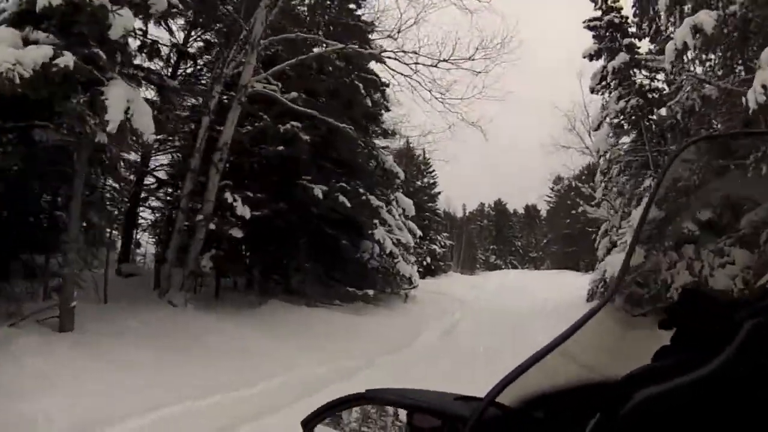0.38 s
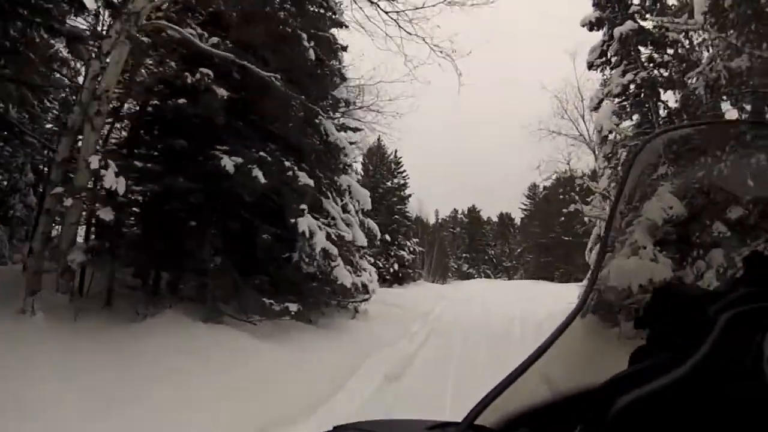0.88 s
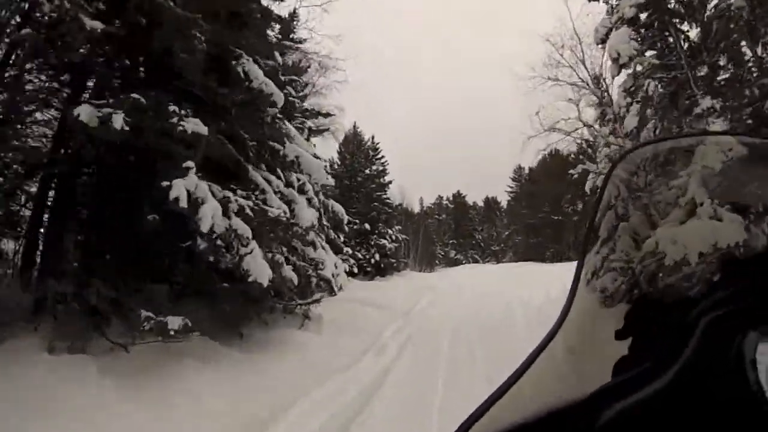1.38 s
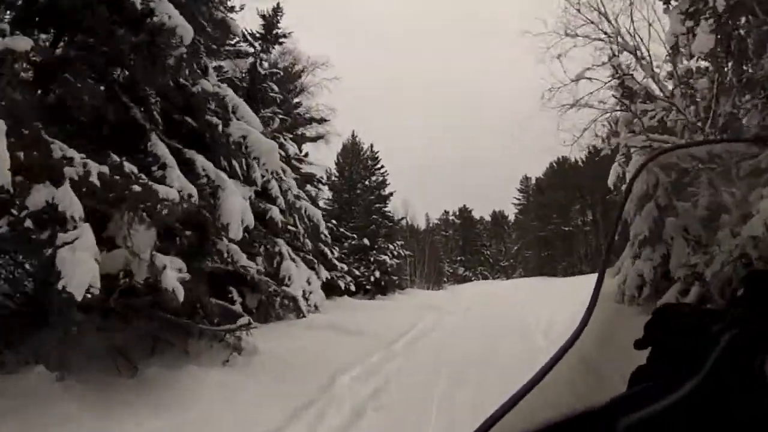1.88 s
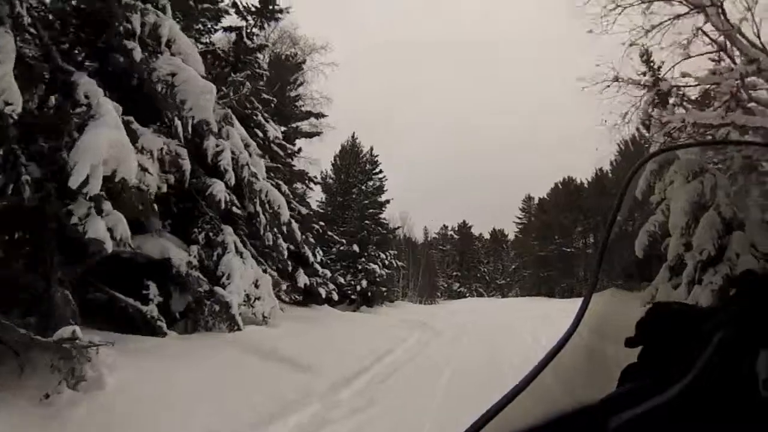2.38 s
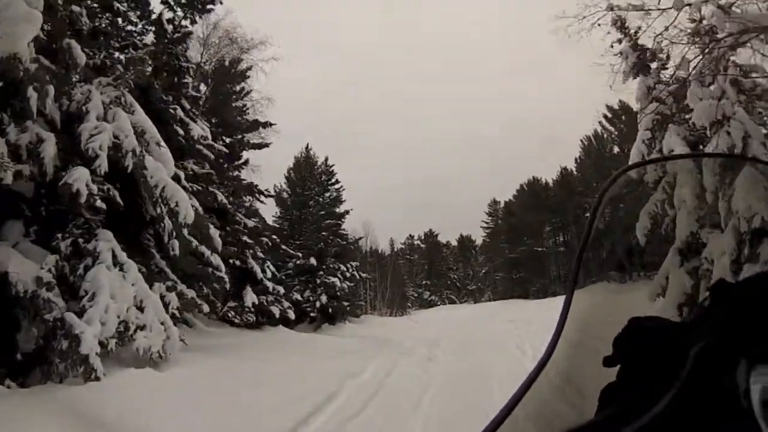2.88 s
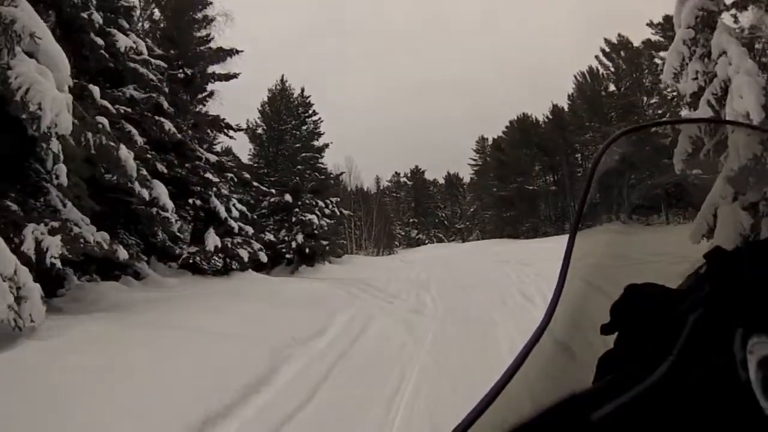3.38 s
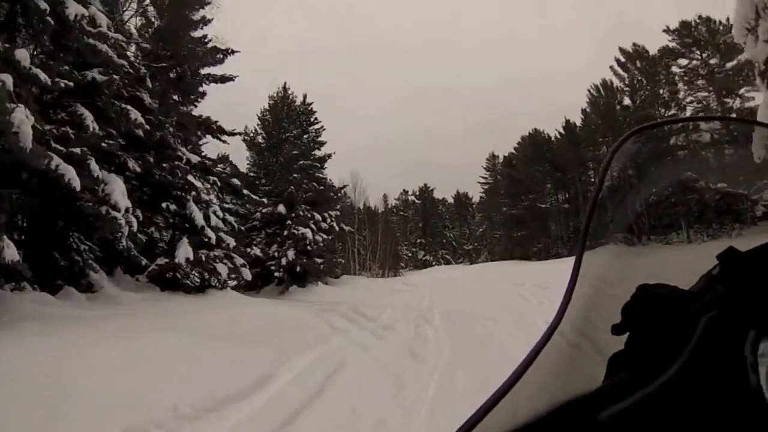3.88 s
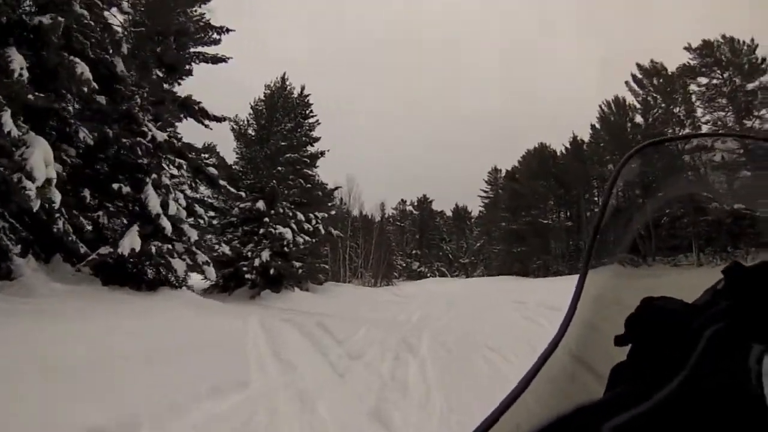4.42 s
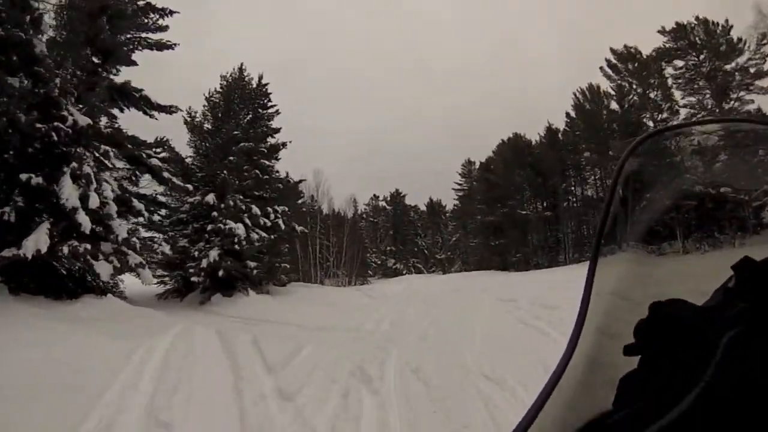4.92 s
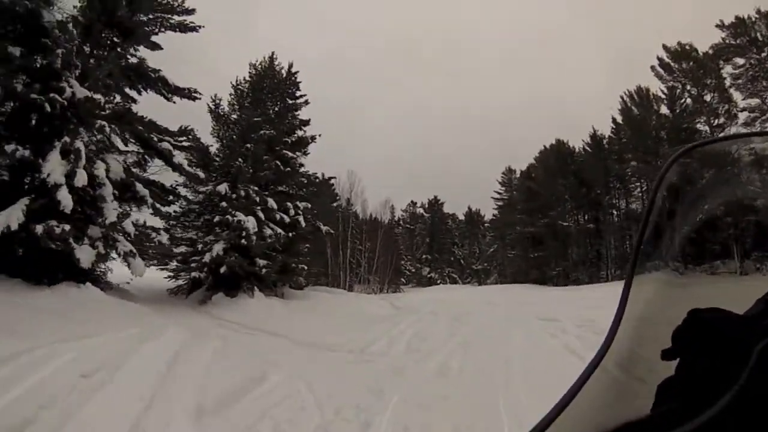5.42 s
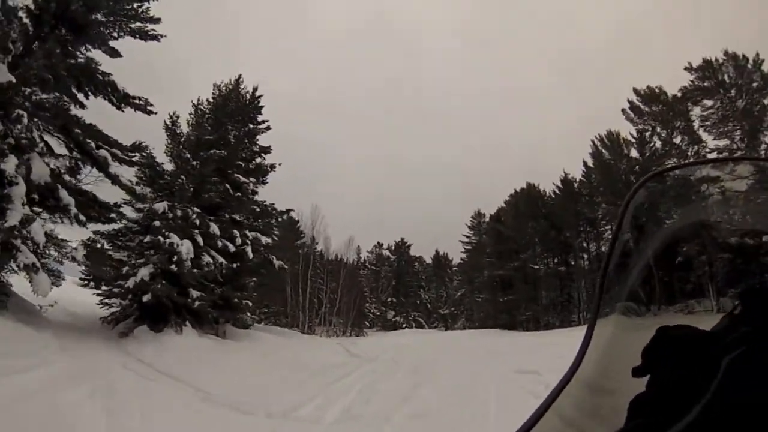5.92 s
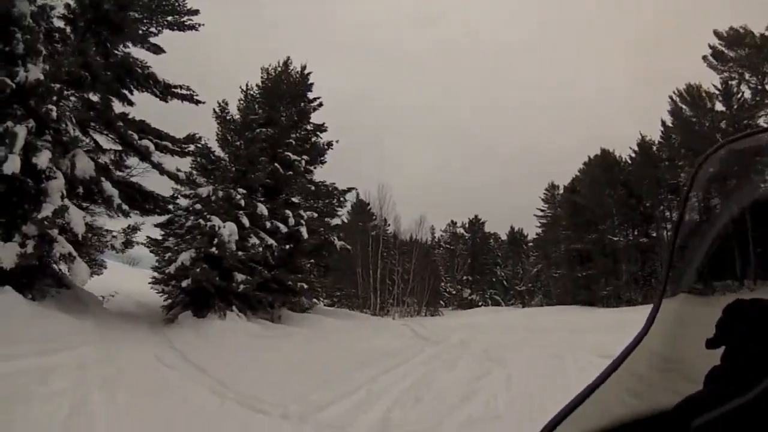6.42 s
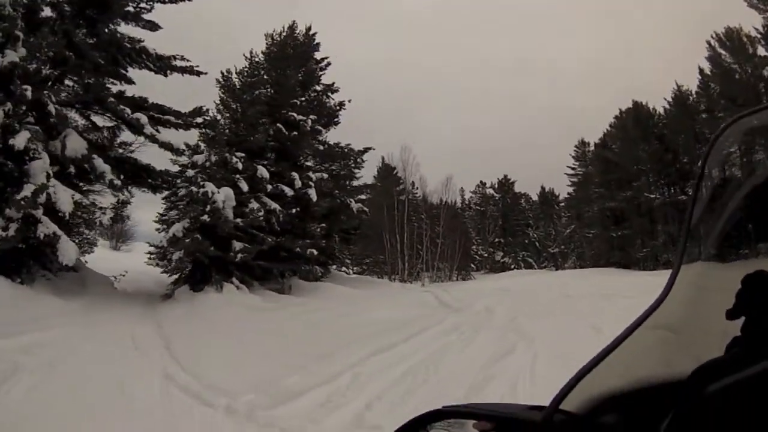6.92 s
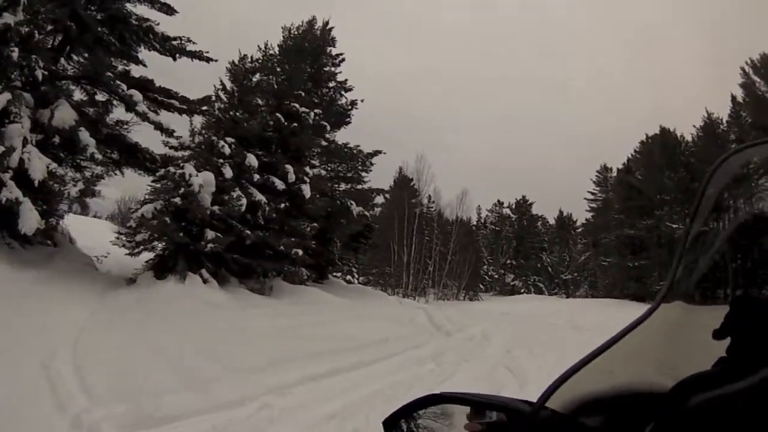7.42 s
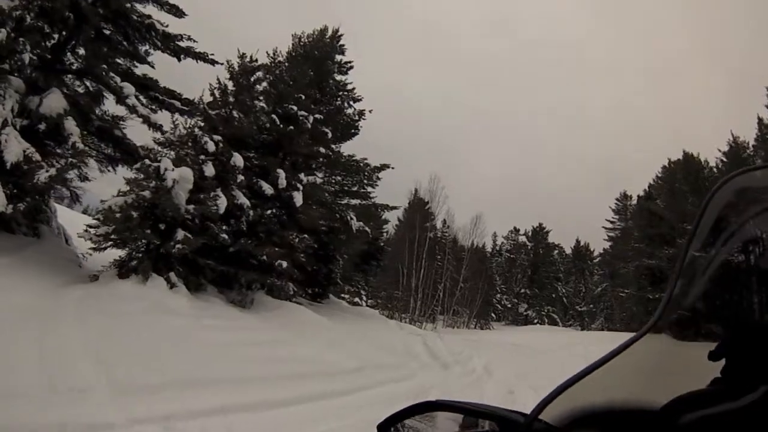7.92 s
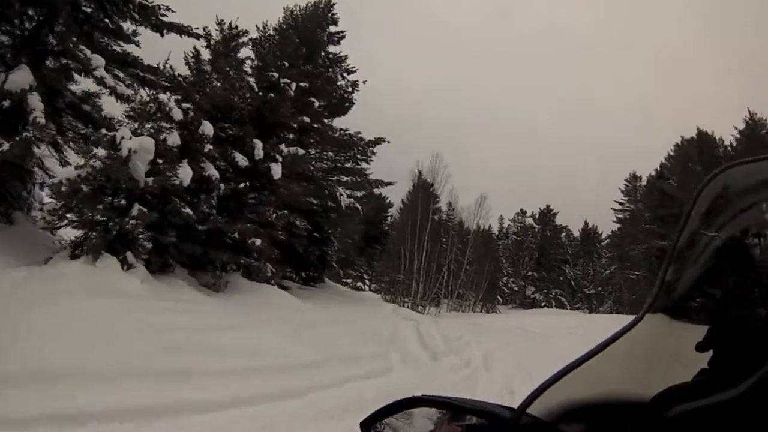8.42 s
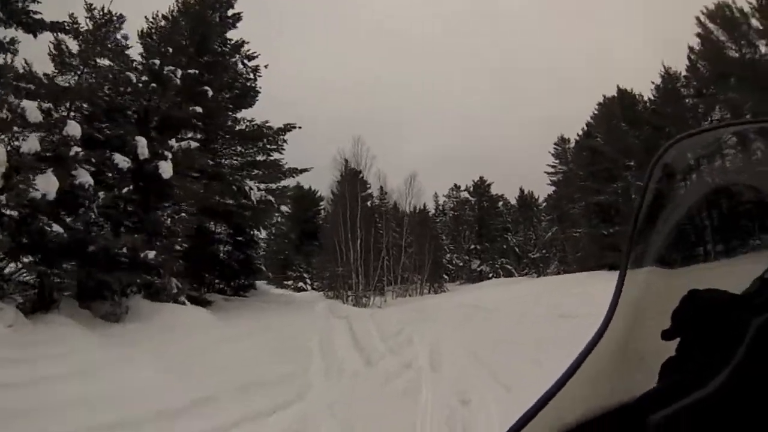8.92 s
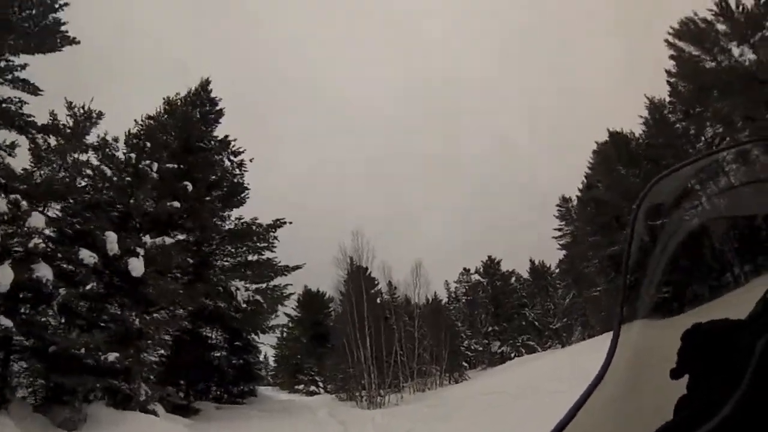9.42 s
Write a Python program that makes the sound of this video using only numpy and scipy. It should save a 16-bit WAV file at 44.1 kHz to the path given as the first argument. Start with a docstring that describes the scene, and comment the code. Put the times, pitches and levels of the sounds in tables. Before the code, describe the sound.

A snowmobile engine drones with a deep, boxy boom and muffled hiss while bumps shudder low and plastic ticks and knocks rattle close by.

```python
"""A three-cylinder snowmobile cruises on a snowy trail, heard by a camera shut in a plastic case on the rider.
From the start the engine booms as tones locked to its firings, and noise rings in the case; ticks come at once.
Bumps shudder the mount near 35 Hz throughout; a flurry of ticks comes near 3 s and more from 5.7 s.
From 6.2 s knocks of a loose part grow frequent, and between 7.5 and 9.2 s the ticks crowd together.
At 9.22 s the throttle closes: upper engine tones swell briefly, then the hiss and rumble ease."""
import sys
import numpy as np
from scipy import signal
from scipy.fft import rfft, irfft, next_fast_len
from scipy.io import wavfile
from scipy.ndimage import uniform_filter1d, map_coordinates

SR = 44100
rng = np.random.default_rng(int(sys.argv[2]) if len(sys.argv) > 2 else 0)


def voltage_ratio(decibels):
    """Convert decibels (scalar or array-like) to amplitude ratios, 20 dB per decade."""
    exponent = np.asarray(decibels, float) / 20
    return 10 ** exponent


def put_to_file(sound):
    """Save the sound as 16-bit audio at rate SR, in the file named by the first command-line argument."""
    columns = np.atleast_2d(sound).T  # one column per channel
    safe = np.clip(columns, -1, 1)
    whole_steps = np.round(safe * 32767)
    wavfile.write(sys.argv[1], SR, whole_steps.astype(np.int16))


N = 421596
TIME = np.arange(N) / SR  # seconds

# engine speed as its firing rate [time_s, firing_hz]
FIRING_RATE = [(0.0, 55.6), (0.25, 58.4), (0.5, 59.05), (0.95, 58.2), (1.3, 56.1), (1.48, 56.2),
               (1.7, 57.35), (2.3, 58.05), (3.1, 58.3), (3.3, 58.65), (3.95, 58.15), (4.3, 56.7),
               (4.7, 57.4), (4.9, 58.4), (5.4, 58.0), (6.35, 58.0), (6.75, 58.4), (7.1, 58.4), (7.35, 58.2),
               (7.95, 58.25), (8.3, 57.95), (8.5, 58.6), (8.95, 56.8), (9.09, 54.2), (9.22, 52.3),
               (9.56, 52.8)]
# boom at the firing rate [time_s, level_db]
BOOM_LEVEL = [(0.0, -32), (0.05, -16.5), (0.21, -20), (0.45, -14.5), (0.74, -23.5), (0.8, -25), (0.85, -15),
              (1.25, -14.5), (1.3, -22), (1.36, -16), (5.43, -15.5), (6.02, -17.5), (6.42, -15.5),
              (6.58, -20), (6.65, -15), (7.45, -17.5), (7.59, -22), (7.93, -16), (8.44, -21), (8.57, -15),
              (8.73, -15.5), (8.86, -22.5), (9.08, -15.5), (9.21, -24.5), (9.25, -17), (9.28, -15),
              (9.38, -14.5), (9.51, -16.5), (9.56, -21)]
# tone at twice the firing rate [time_s, level_db]
SECOND_LEVEL = [(0.0, -42), (0.05, -22.5), (0.85, -35.5), (0.88, -27), (1.2, -36), (1.73, -42),
                (1.81, -26.5), (3.01, -41), (3.11, -24), (3.43, -31.5), (4.07, -28.5), (4.82, -39),
                (4.9, -28.5), (8.04, -41.5), (8.07, -29.5), (8.95, -46), (9.18, -37), (9.23, -25),
                (9.28, -35), (9.38, -30), (9.44, -36), (9.52, -28), (9.56, -37)]
# whine at six times the firing rate [time_s, level_db]
WHINE_LEVEL = [(0, -50), (0.6, -48), (1.4, -46.5), (2.5, -48.5), (3.2, -50.5), (3.9, -50), (4.4, -47),
               (4.95, -54), (5.5, -48.5), (6.0, -51.5), (7.0, -49), (7.7, -50.5), (8.4, -47.5), (8.95, -47),
               (9.2, -51), (9.56, -59)]
# faint upper engine tones [multiple of the firing rate, cruise_db, gain_as_throttle_closes_db]
FAINT_TONES = [(3, -48, 12.5), (4, -52.5, 17), (5, -74, -5), (7, -63, -4), (8, -66.5, 13), (10, -64.5, 3),
               (12, -67, -7)]
# engine and track clatter in the case; the drone and hiss follow it [time_s, clatter_db]
CLATTER_LEVEL = [(0.0, -34.5), (0.4, -35), (0.77, -34.5), (1.14, -37), (2.29, -36.5), (2.9, -39.5),
                 (3.19, -36), (3.62, -38), (4.15, -35), (4.5, -39.5), (5.01, -39.5), (5.67, -36),
                 (6.23, -40.5), (6.58, -34.5), (7.22, -39), (7.72, -38), (7.91, -34.5), (9.1, -35),
                 (9.265, -33), (9.285, -42), (9.56, -41)]
# lower resonances of the case [pitch_hz, width_hz, level_db]
CASE_LOW = [(1142, 102, -6), (1390, 82, -3.5), (1477, 53, 0.5), (1595, 81, 1.5), (1967, 92, -7.5),
            (2176, 60, -8), (2430, 177, -12.5), (2800, 310, -20.5)]
# upper resonances of the case, for the hiss [pitch_hz, width_hz, level_db]
CASE_HIGH = [(3380, 600, -6), (4060, 310, -0.5), (4890, 280, 1), (5580, 545, -5.5), (6370, 600, -6),
             (9540, 960, -20), (10760, 610, -20), (13500, 2000, -39)]

# ringing modes that every blow sets off, before each kind of blow alters them [pitch_hz, t60_s]
RING_MODES = [(500, 0.014), (670, 0.034), (1200, 0.015), (1450, 0.014), (2010, 0.0088), (2260, 0.0096),
              (2600, 0.0089), (3200, 0.016), (3960, 0.019), (4930, 0.0075), (5500, 0.0037), (6500, 0.0072),
              (7800, 0.011), (9550, 0.0037), (11300, 0.0088), (13000, 0.0034)]
# family of each mode: 0 panel, 1 knock, 2 tick, 3 clink, 4 snap, 5 chime, 6 hum of the panel [family]
MODE_FAMILY = [0, 6, 1, 1, 2, 2, 2, 3, 3, 5, 5, 4, 4, 4, 4, 4]
# how strongly a tick drives each mode [level_db]
TICK_MODES = [-8, -4, -8.5, -2, -2.5, -9, -15.5, -5.5, -6.5, -8, -9, -2.5, -6.5, -8.5, -6, -10]
# how strongly a knock drives each mode [level_db]
KNOCK_MODES = [-14, -19, -3, -10, -34, -12, -13, -19, -14, -7.5, -17.5, -18, -12, -14, -14, -24]
# how strongly a thunk drives each mode [level_db]
THUNK_MODES = [-5, -5, -11, -20, -24, -4, -9, -12, -28, -24, -23, -22, -29, -32, -28, -34]
# sharp ticks on the case, last three against the tick [start_s, tick_db, knock_db, clink_db, snap_db]
TICKS = [(0.025, -28, 2, -18, -28), (0.165, -23, 1, -18, -28), (0.199, -26.5, 8, -20, -30),
         (0.0767, -19.5, -7, -18, -22), (0.131, -20.5, -13, -18, -20), (0.54, -19.5, -6, -18, -24),
         (0.6284, -22.5, -17, -2, -8), (0.6552, -18, -15, -9, -8.5), (3.0718, -24, -18, -14, -34),
         (3.0877, -24, -16, -20, -32), (3.1032, -23, -18, -22, -34), (3.1368, -21, -10, -24, -34),
         (3.1551, -20, -15, -21, -34), (3.1716, -23, -18, -20, -34), (3.1865, -24, -16, -18, -34),
         (3.2065, -31, 2, -18, -34), (3.7673, -20.5, -9, -25, -30), (5.7046, -30, -14, 6, -10),
         (5.7133, -18, -14, -4, -12), (5.7216, -17, -2, -1, -4.5), (5.7605, -26, 0, -16, -30),
         (5.813, -21, 1, -10, -32), (5.867, -24, 2, -10, -27), (5.9189, -21.5, -19, -11, -27),
         (6.0202, -22, -21, -21, -23), (6.0513, -23, -17, -23, -34), (6.4357, -18.5, -2, -13, -37),
         (6.4691, -27, -19, -21, -39), (7.5328, -19, -2, -14, -25), (7.5629, -15, -17, -14, -25),
         (7.622, -23, -10, -20, -32), (7.6526, -18, -9, -20, -25), (7.706, -24, -2, -12, -32),
         (7.7394, -31, 0, -20, -32), (7.805, -25, 5, -20, -34), (7.824, -25.5, 5, -18, -34),
         (7.9419, -25, 3, -18, -34), (8.0118, -24, 4, -20, -34), (8.514, -32, -8, -6, -30),
         (8.576, -25, 3, -20, -34), (7.6854, -17, -22, -15, -25), (7.7717, -23, -3, -14, -18),
         (7.8917, -20, 0, -9, -39), (7.9782, -15, -2, -13, -28), (8.0294, -22.5, 5.5, -16, -31),
         (8.0656, -21, 0, -17, -35), (8.2021, -17.5, -15, -14, -21), (8.2362, -17, -7, -19, -26),
         (8.528, -12, -5, -11, -23), (8.5456, -14, -24, -23, -37), (8.8168, -23, -12, -9, -14),
         (8.8318, -21.5, -11, 0, -12), (9.1213, -20.5, 1, -3, -10), (9.1398, -10.5, -2, -7.5, -23),
         (9.2625, -32, 4, -18, -34), (9.3218, -29, 5, -20, -30), (9.3412, -30, 9, -22, -26),
         (9.381, -26, 6.5, -25, -38), (9.3985, -29.5, 9, -18, -31), (9.436, -31, 6, -6, -36)]
# a loose part knocking in step with the engine's cycle, last three against the blow
# [start_s, level_db, knock_db, clink_db, chime_db]
KNOCKS = [(4.088, -29.5, 4, 4, -14), (6.2672, -28.5, 0.5, -5, -1), (6.9884, -24.5, -6, -4, -7),
          (7.037, -23.5, -7, -1, 2.5), (7.195, -30.5, 2, 0, -10), (7.242, -30, 1, 0, 1.5),
          (7.4005, -28.5, 2, -1, -6), (7.4482, -26, 1.5, -3, -1), (7.5, -33, 3, 4, -12),
          (7.5525, -27.5, 1.5, -5, -28), (7.8635, -28.5, 1, 2, -8), (7.9113, -23.5, 2, -3, -9),
          (7.967, -34, 1, -19, -19), (8.1718, -27, 4, -1, -3), (8.221, -27.5, 1, -26, -26),
          (8.3801, -31, 2, -2, -4), (8.431, -21, -4, -3, -4), (8.584, -26.5, 2, -6, -6),
          (8.633, -24, 1, -1, 2.5), (8.684, -21, -6.5, -1, -3), (8.7923, -25, 0, -6, -7),
          (8.846, -29, 2.5, 2, -10), (9.173, -29, -2, 0, -3), (9.4768, -34, -1, 1, -14)]
# dull thunks on a panel of the case, hum against the thunk [start_s, level_db, hum_db]
THUNKS = [(0.625, -17.5, 2.5), (0.6552, -20, 1.5), (5.7046, -30, 0), (5.7133, -35, -2), (9.2617, -23, -11)]
# spells of loose parts chattering [start_s, length_s, middle_level_db, share of the firings that tick]
CHATTER_SPELLS = [(5.741, 0.2, -29.5, 0.38), (6.444, 0.22, -27.5, 0.76), (7.604, .7, -29.5, .4),
                  (8.5, 0.46, -30, .4)]
# low thumps through the mount, moved to the nearest boom trough [near_s, peak_db, pitch_hz]
THUMPS = [(0.046, -22, 120), (0.117, -21, 125), (0.134, -24, 130), (5.427, -17, 115), (5.549, -22, 105),
          (9.234, -21, 115), (9.27, -20, 125)]

# mount shudder on bumps [time_s, level_db]
SHUDDER_LEVEL = [(0.0, -20), (0.1, -36), (0.88, -31), (0.93, -43), (1.17, -27), (1.51, -22.5), (1.59, -31),
                 (2.39, -26), (2.88, -35), (2.93, -25.5), (3.27, -35), (3.35, -25), (3.49, -39),
                 (3.89, -30), (3.99, -33), (4.42, -28), (5.43, -33), (6.12, -19), (6.26, -33), (6.55, -34),
                 (7.69, -17), (8.02, -31), (8.28, -24), (8.33, -29), (8.79, -34), (8.94, -45), (9.24, -32),
                 (9.56, -39)]
# middle pitch of the shudder [time_s, pitch_hz]
SHUDDER_PITCH = [(0, 38.08), (5.7, 39.1), (6.2, 35.56), (6.9, 37.77), (7.3, 33.9), (8.1, 32.77),
                 (8.5, 35.9), (9.56, 33.5)]
# tone colour of the rumble through the sled [pitch_hz, level_db]
RUMBLE_COLOUR = [(12, -120), (20, -17), (40, -0.5), (80, -3.5), (105, -2.5), (150, -11.5), (220, -23),
                 (320, -35.5), (600, -120)]
# jolts that swell the rumble [centre_s, gain_db]
JOLTS = [(0.08, 5.5), (0.61, 9), (3.83, 8), (4.9, 3), (5.43, 5), (9.24, 5)]
# tone colour of the track drone [pitch_hz, level_db]
DRONE_COLOUR = [(100, -120), (200, -0.5), (300, 0.5), (420, -1), (520, -7), (680, -4), (850, -6.5),
                (1100, -9.5), (2000, -120)]

START_TURN = 0.4  # share of a firing already past at the start
COAST_S, COAST_FADE_S = 9.22, 0.34  # throttle closes (s); time scale of the upper tones sinking back (s)
CRUISE_DB, HISS_DB = -37, -46.5  # clatter at cruise, and the hiss that goes with it
HISS_GROWS = 0.86  # dB of hiss per dB of clatter
HISS_COAST_DB, HISS_LAG_S = -2.5, 0.054  # the hiss drops soon after the throttle closes
RUMBLE_DB, RUMBLE_COAST_DB, RUMBLE_LAG_S = -28.5, -1, 0.074  # the rumble eases later still
JOLT_S = 0.041  # from a jolt's centre to where its dB gain is down to 37 percent
TICK_PANEL_DB, MIDDLING_DB = -10.5, -24  # panel against a tick of middling level; that level
PANEL_LOSS = 0.56  # dB the panel falls behind for each dB a tick exceeds the middling one
KNOCK_PANEL_DB, KNOCK_SNAP_DB = -27, -29  # against the knock
SAGS_BELOW_HZ = 3000  # only modes below this bend in pitch
STRAY_SHARE, STRAY_DB = 0.08, -30.5  # ticks outside the spells: share of the firings, middle level
CHATTER_LEAD = 0.25  # share of a firing ahead of the boom's crest


def firings():
    """Counts the firings so far by adding up the firing rate, a little uneven from stroke to stroke."""
    return np.cumsum(curves(FIRING_RATE)[0]) / SR + START_TURN + 0.013 * wobble(25)


def boom(turns):
    """Nearly pure tones at multiples of the firing rate; the upper ones sharpen the boom's troughs."""
    angle = 2 * np.pi * turns
    first_db = curves(BOOM_LEVEL)[0] + 0.43 * wobble(22) + 0.53 * wobble(9)
    second_db = curves(SECOND_LEVEL)[0] + 1.6 * wobble(13)
    whine_db = curves(WHINE_LEVEL)[0] + 1.2 * wobble(8)
    tones = voltage_ratio(first_db) * np.cos(angle + 0.29 * wobble(4))
    tones += voltage_ratio(second_db) * np.cos(2 * angle - 2.1)
    tones += voltage_ratio(whine_db) * np.cos(6 * angle + 0.2 * wobble(8))
    # the closing throttle changes the upper tones for a moment
    since_coast = np.maximum(TIME - COAST_S, 0)
    freed = coast(0) * np.exp(-(since_coast / COAST_FADE_S) ** 2)
    for multiple, cruise_db, coast_db in FAINT_TONES:
        level_db = cruise_db + coast_db * freed + 0.76 * wobble(13) + 2.4 * wobble(4)
        # counting the angle from the trough makes all of these dip together there
        tones -= voltage_ratio(level_db) * np.cos(multiple * (angle + np.pi) + 0.25 * wobble(8))
    return np.sqrt(2) * tones  # so that the levels are rms


def clatter(turns):
    """Engine and track noise pass through the resonances of the case: low clatter and high hiss."""
    clatter_db, = curves(CLATTER_LEVEL)
    hiss_db = HISS_DB + HISS_GROWS * (clatter_db - CRUISE_DB) + HISS_COAST_DB * coast(HISS_LAG_S)
    shared = wobble(9)  # both rise and fall together
    low = filtered(puffs(turns, depth_db=-0.5, scatter_db=1.58, lead=0.71), resonances(CASE_LOW))
    low = filtered(low, high_pass(hz=1020))
    high = filtered(puffs(turns, depth_db=0.6, scatter_db=1.36, lead=0.51), resonances(CASE_HIGH))
    high = filtered(high, high_pass(hz=2880))
    return voltage_ratio(clatter_db + 0.56 * shared) * unit(low) + voltage_ratio(hiss_db + 0.71 * shared) * unit(high)


def puffs(turns, depth_db, scatter_db, lead):
    """Noise that swells and sinks once a firing, each stroke at its own chance strength."""
    shifted = turns + lead  # lead is a share of a firing
    stroke = np.floor(shifted).astype(int) + 2
    size_db = scatter_db * rng.standard_normal(N // 400)[stroke]
    size_db = uniform_filter1d(size_db, size=150)  # no sudden steps between strokes
    swell_db = depth_db * np.cos(2 * np.pi * (shifted - 0.5))
    return unit(voltage_ratio(size_db + swell_db) * rng.standard_normal(N))


def rattle(turns):
    """Blows on the case: sharp ticks, softer knocks that scrape and sag in pitch, and dull thunks."""
    # each row: start, level, then panel, knock, clink, snap, chime and hum against the level
    ticks = []
    for s, db, knock, clink, snap in [*TICKS, *chatter(turns)]:
        panel = TICK_PANEL_DB - PANEL_LOSS * (db - MIDDLING_DB)
        ticks.append((s, db, panel, knock, clink, snap, clink, 0))
    knocks = [(s, db, KNOCK_PANEL_DB, knock, clink, KNOCK_SNAP_DB, chime, 0)
              for s, db, knock, clink, chime in KNOCKS]
    thunks = [(s, db, 0, 0, 0, 0, 0, hum) for s, db, hum in THUNKS]
    sound = blows(knocks, np.array(KNOCK_MODES), contact=0.0004, hold=0.008, sustain=1.3,
                  detune=0.015, sag=0.067, scrape=1.1, blur=0.3)
    sound += blows(thunks, np.array(THUNK_MODES), contact=0.00055, hold=0.001, sustain=0.9,
                   detune=0.02, sag=-0.03, scrape=0.3, blur=0.08)
    sound += blows(ticks, np.array(TICK_MODES), contact=0.00017, hold=0.0008, sustain=0.9,
                   detune=0.03, sag=-0.03, scrape=0.5, blur=0.07)
    return sound


def chatter(turns):
    """Loose parts tick on firings picked by chance, densely in the spells; gives rows like TICKS."""
    steady_turns = np.maximum.accumulate(turns)  # never counts backwards
    s = np.flatnonzero(np.diff(np.floor(steady_turns + CHATTER_LEAD))) / SR
    share, db = np.full(len(s), STRAY_SHARE), np.full(len(s), float(STRAY_DB))
    for start, length, level, dense in CHATTER_SPELLS:
        inside = (s > start) & (s < start + length)
        share[inside], db[inside] = dense, level
    pick, loud, knock, clink, snap = rng.random((N // 600, 5))[:len(s)].T
    rows = np.column_stack([s, db + 5 * (loud - 0.5), -3 + 9 * knock, -17 + 8 * clink, -30 + 6 * snap])
    return rows[pick < share]


def blows(rows, share_db, contact, hold, sustain, detune, sag, scrape, blur):
    """Each blow makes the same modes ring: they rise, hold while driven, then die away exponentially.

    contact and hold are in s; sustain stretches the t60; detune is the chance spread of pitch, as a share.
    sag is the share by which low modes fall in pitch (negative: rise); blur spreads their starts (cycles).
    scrape roughens the tone: the phase strays at random by about half of it (radians) each millisecond.
    """
    out, t = np.zeros(N + SR), np.arange(SR // 20) / SR
    hz, t60 = np.transpose(RING_MODES)
    decay_db = -60 * np.maximum(t - hold, 0) / (sustain * t60[:, None])
    swell = (1 - np.exp(-t / contact)) ** 2 * voltage_ratio(decay_db)
    swell = swell / swell.max(axis=1, keepdims=True)
    sag = sag * (hz < SAGS_BELOW_HZ)
    bent = t + sag[:, None] * 0.011 * (1 - np.exp(-t / 0.0099))  # time runs fast, then settles
    luck = rng.standard_normal((len(rows), 3, len(hz)))
    for (s, db, panel, knock, clink, snap, chime, hum), (size, tune, phase) in zip(rows, luck):
        family_db = np.take([panel, knock, 0, clink, snap, chime, panel + hum], MODE_FAMILY)
        level_db = db + share_db + family_db + 1.74 * size
        # a random walk in steps of 44 samples, smoothed
        drift = np.cumsum(rng.standard_normal((len(hz), 52)), axis=1)
        drift = np.repeat(drift, 44, axis=1)
        drift = uniform_filter1d(drift - drift[:, :1], size=44)[:, :len(t)]
        pitch = hz * (1 - sag / 2 + detune * tune)
        cycles = pitch[:, None] * bent + 0.5 + blur * phase[:, None]
        ringing = swell * np.sin(2 * np.pi * cycles + scrape / 2 * drift)
        out[round(s * SR):][:len(t)] += voltage_ratio(level_db) @ ringing
    return out[:N]


def thumps(turns):
    """The mount bottoms out as the boom swings down: one soft push with a rebound on either side."""
    troughs = np.flatnonzero(np.diff(np.floor(np.maximum.accumulate(turns) + 0.5))) / SR
    out = np.zeros(N)
    for near, db, hz in THUMPS:
        centre = troughs[np.abs(troughs - near).argmin()]
        u = (np.pi * hz * (TIME - centre)) ** 2
        out += voltage_ratio(db) * (2 * u - 1) * np.exp(-u)
    return out


def shudder():
    """Bumps shake the mount at its own wandering pitch: one low tone."""
    hz = curves(SHUDDER_PITCH)[0] + 2.59 * wobble(10)
    tone = np.sqrt(2) * np.sin(2 * np.pi * np.cumsum(hz) / SR)
    return voltage_ratio(curves(SHUDDER_LEVEL)[0] + 1.5 * wobble(9)) * tone


def rumble():
    """Bumps rumble through the sled: deep noise that swells at each jolt."""
    jolt_db = sum(db * np.exp(-((TIME - s) / JOLT_S) ** 2) for s, db in JOLTS)
    level_db = RUMBLE_DB + jolt_db + RUMBLE_COAST_DB * coast(RUMBLE_LAG_S)
    return voltage_ratio(level_db + 1.84 * wobble(12) + 1.12 * wobble(3.6)) * coloured(RUMBLE_COLOUR)


def drone():
    """The track drones with the load: mid-low noise that follows the clatter from 9.5 dB below."""
    return voltage_ratio(curves(CLATTER_LEVEL)[0] - 9.5 + 0.38 * wobble(10)) * coloured(DRONE_COLOUR)


def coast(lag):
    """Goes from 0 to 1 over 0.038 s as the throttle closes, starting lag seconds late."""
    return np.clip((TIME - COAST_S - lag) / 0.038, 0, 1)


def unit(x):
    """Scales a sound to an rms of 1."""
    return x / np.sqrt(np.mean(x ** 2) + 1e-20)


def curves(rows):
    """Draws straight lines between table rows: one value per sample for each column after the time."""
    s, *columns = np.transpose(rows)
    return [np.interp(TIME, s, column) for column in columns]


def wobble(rate):
    """A smooth random curve through rate random points a second."""
    points = rng.standard_normal(int(N * rate / SR) + 4)
    return map_coordinates(points, [np.arange(N) * rate / SR])


def filtered(x, response):
    """Multiplies the spectrum of x by a response, given as a function of frequency."""
    m = next_fast_len(N + SR // 2)  # spare room for the ringing
    return irfft(rfft(x, m) * response(np.fft.rfftfreq(m, 1 / SR)), m)[:N]


def resonances(modes):
    """Response of ringing modes side by side, with alternating signs."""
    def response(f):
        total = 0
        for k, (hz, width, db) in enumerate(modes):
            total = total + (-1) ** k * voltage_ratio(db) * 1j * f * width / (hz * hz - f * f + 1j * f * width)
        return total
    return response


def high_pass(hz):
    """Response of a steep low cut."""
    return lambda f: 1 / np.sqrt(1 + (hz / (f + 1)) ** 8)


def coloured(spectrum):
    """Random noise of rms 1 shaped by a spectrum, with straight dB lines on a log pitch scale."""
    hz, db = np.transpose(spectrum)
    white = rng.standard_normal(N)
    return unit(filtered(white, lambda f: voltage_ratio(np.interp(np.log(f + 1), np.log(hz + 1), db))))


def scene():
    """Adds up everything at one microphone inside the case."""
    turns = firings()
    engine = boom(turns) + clatter(turns)
    loose_parts = rattle(turns) + thumps(turns)
    ride = shudder() + rumble() + drone()
    return (engine + loose_parts + ride)[None]


def roll_off(x):
    """The treble ends steeply here."""
    return signal.sosfilt(signal.butter(12, 15760, fs=SR, output="sos"), x)


def record(dry):
    """Stores the finished mix as the camera does."""
    return roll_off(dry)


dry = scene()
out = record(dry)
put_to_file(out)
```